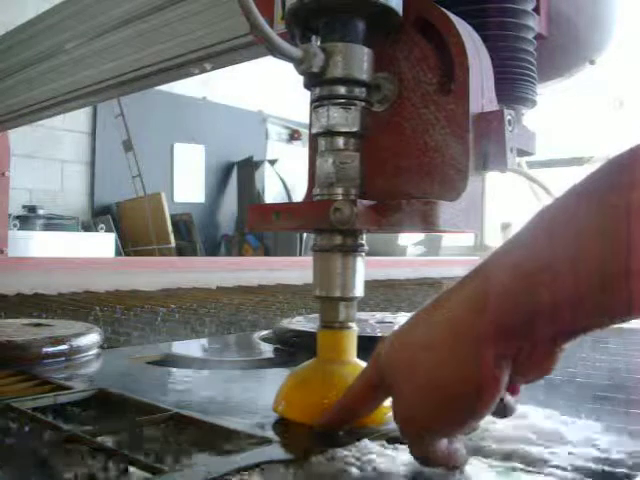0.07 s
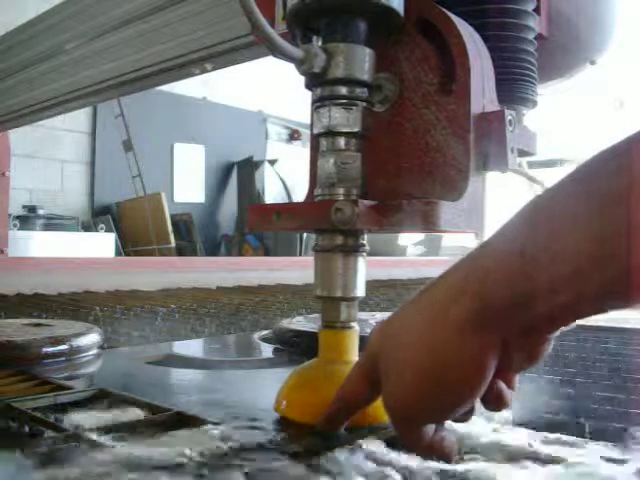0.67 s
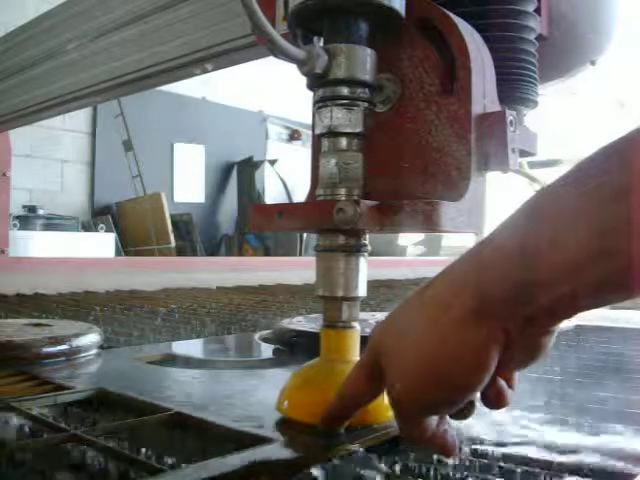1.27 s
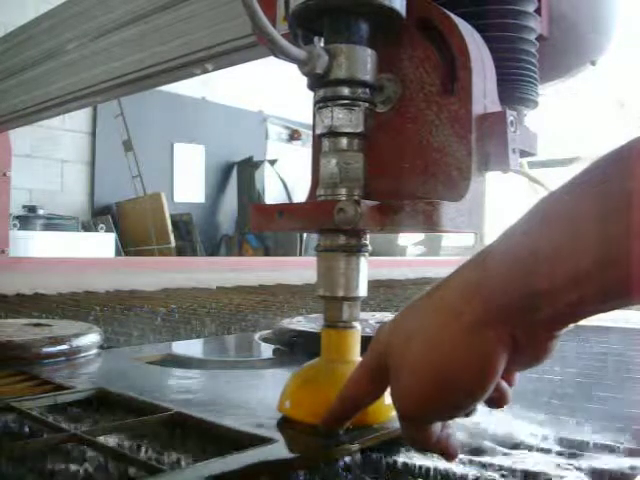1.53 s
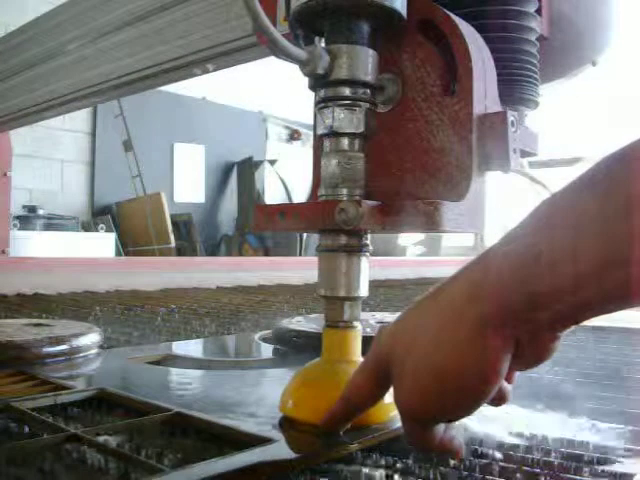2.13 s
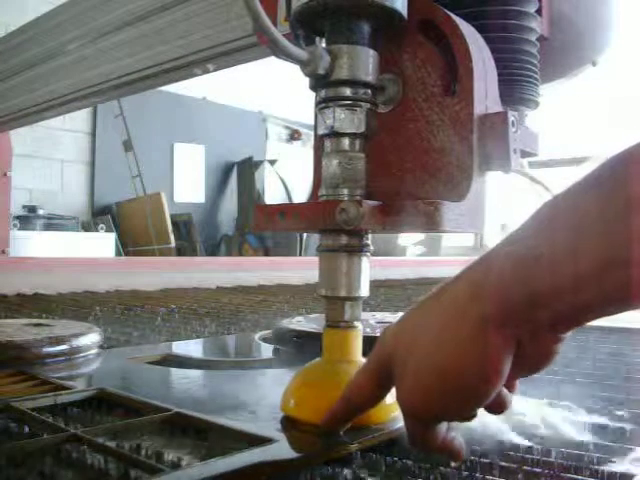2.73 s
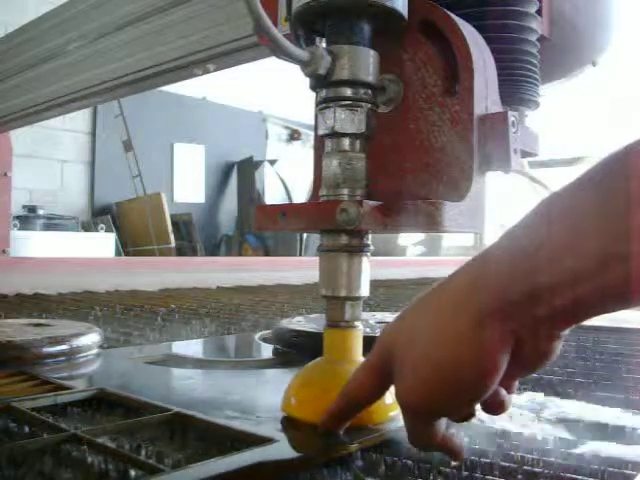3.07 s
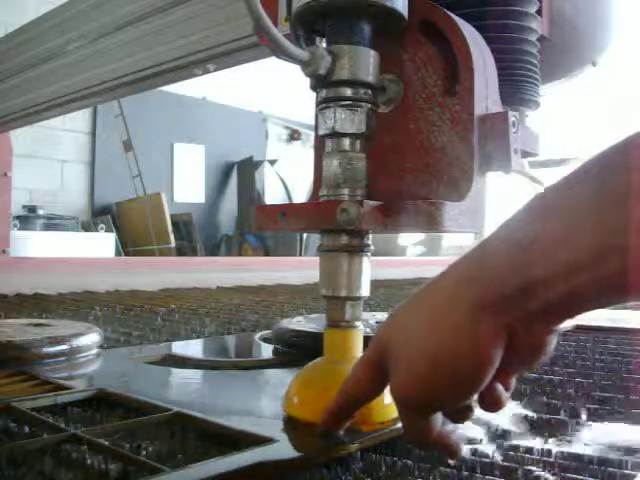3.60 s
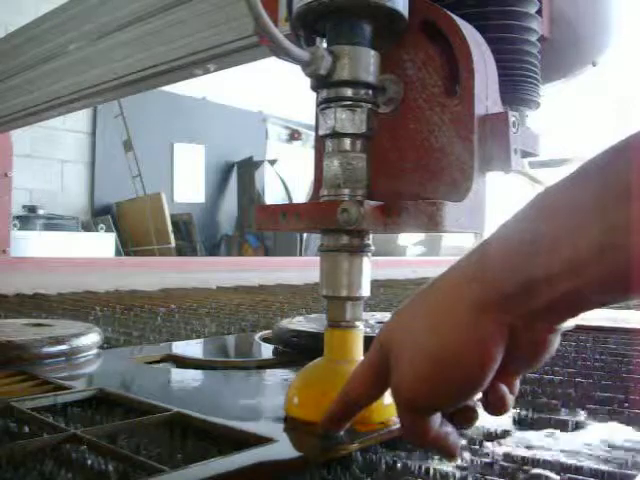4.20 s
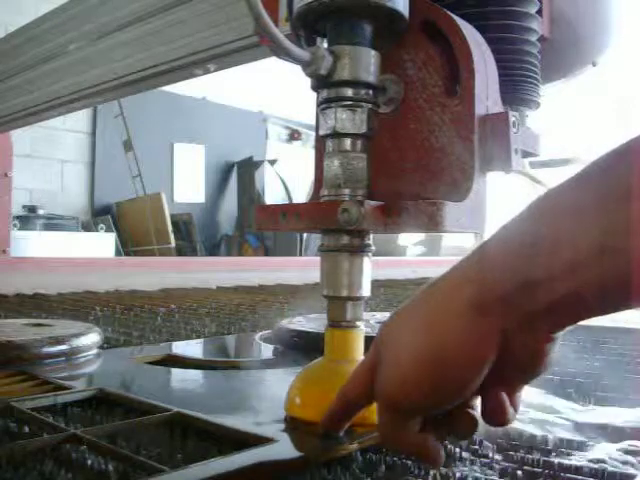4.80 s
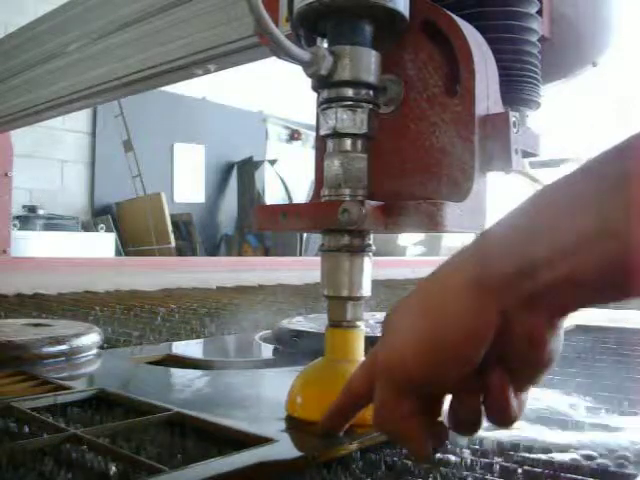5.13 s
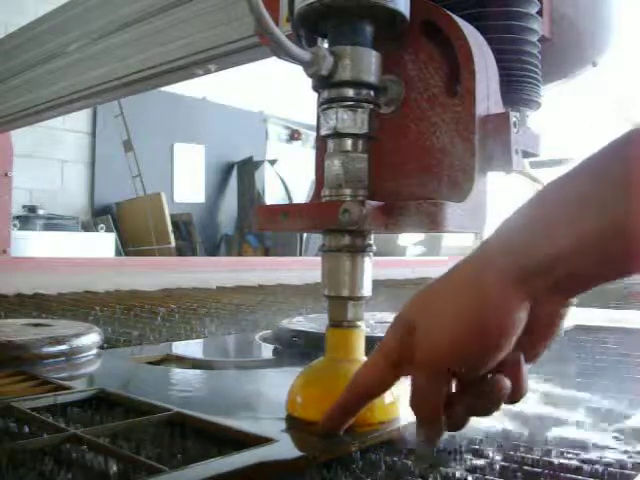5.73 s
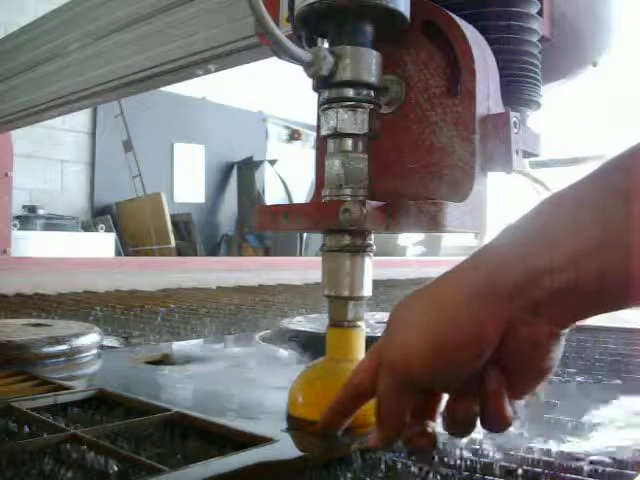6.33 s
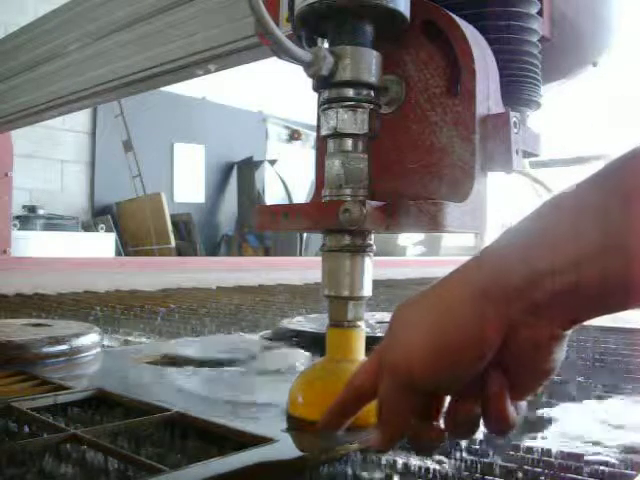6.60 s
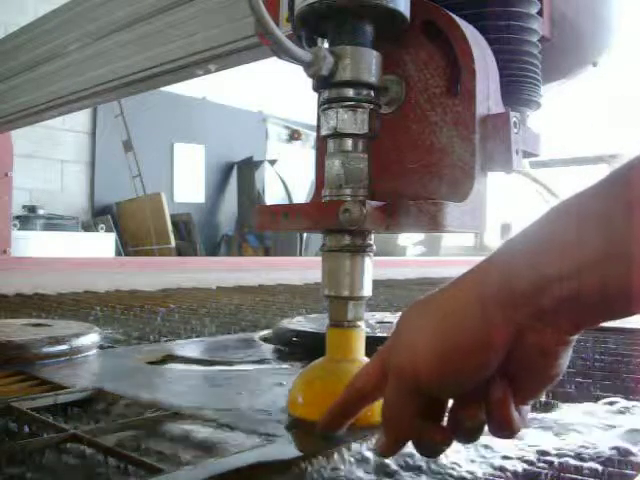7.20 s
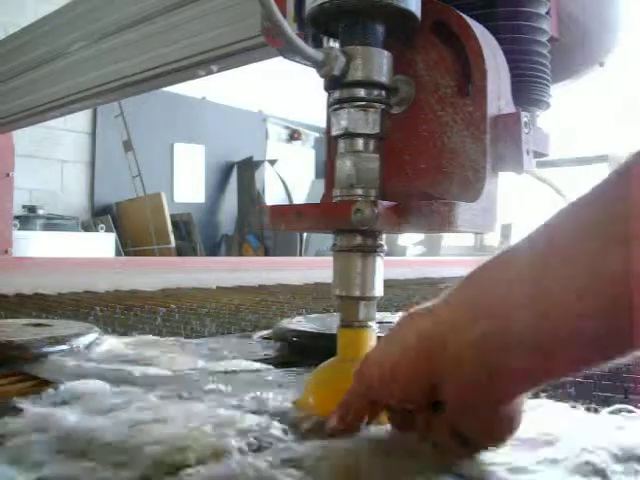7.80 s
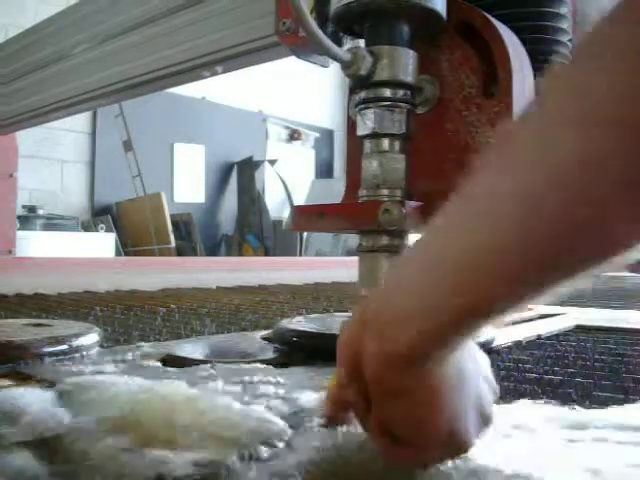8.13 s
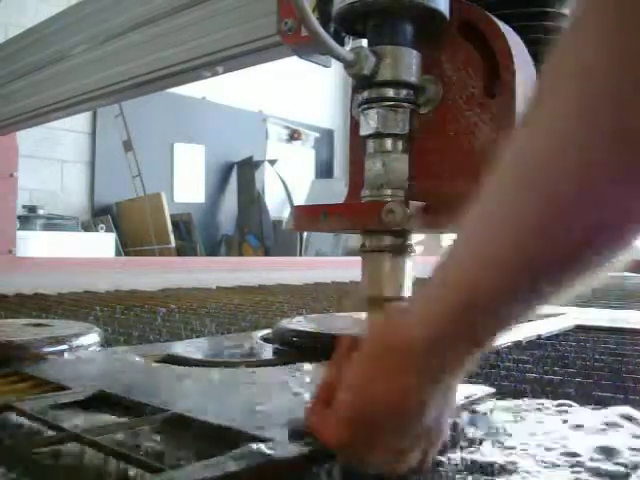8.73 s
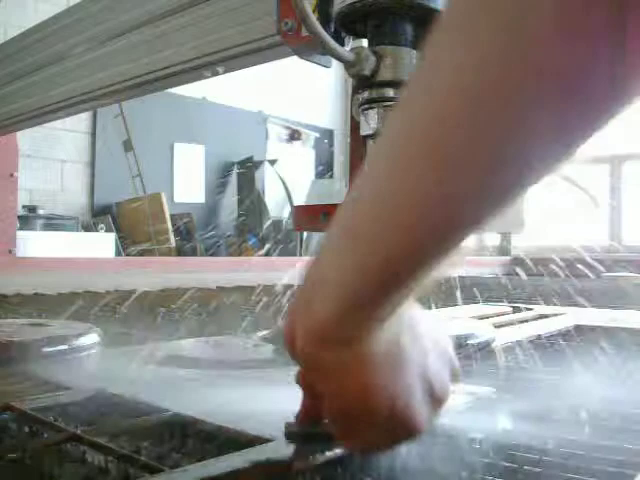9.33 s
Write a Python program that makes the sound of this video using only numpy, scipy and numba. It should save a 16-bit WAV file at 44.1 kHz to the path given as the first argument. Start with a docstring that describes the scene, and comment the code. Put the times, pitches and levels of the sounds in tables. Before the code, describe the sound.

Close to a small microphone in a workshop, a waterjet cutter roars and hisses through steel, choking and squirting as water floods the cut. The hiss steadies, then stops abruptly, leaving the booming rumble of a pump and light splashes of tank water on the plate. Near the end the jet bursts back in with a sharp spit and a wavering whistle over the hiss.

```python
"""An abrasive waterjet cuts a steel plate over a water tank, an arm's length from a small camera in a workshop.
The jet roars in the kerf, rings the plate and sputters whenever water floods the cut. Its valve shuts for
two seconds: the camera's gain control recovers and lifts the pump rumble and the splashing tank water,
until the jet strikes again and whistles through a fresh hole."""
import sys
import numpy as np
from scipy import signal
from scipy.fft import rfft, irfft
from scipy.io import wavfile
from scipy.ndimage import uniform_filter1d, minimum_filter1d
from numba import njit

SR = 44100
rng = np.random.default_rng(int(sys.argv[2]) if len(sys.argv) > 2 else 0)


def to_wav(sig):
    """Store sig (one row per channel, or 1-D mono) as 16-bit WAV at the path in sys.argv[1].

    Samples outside -1..1 are clipped; the rate is SR.
    """
    pcm = np.clip(np.atleast_2d(sig), -1, 1) * 32767
    pcm = np.round(pcm).astype(np.int16)
    wavfile.write(sys.argv[1], SR, pcm.T)  # frames by channels


N = 421155
TIME = np.arange(N) / SR
FREQS = np.fft.rfftfreq(N, 1 / SR)
VALVE_SHUTS_S, VALVE_OPENS_S = 7.09, 9.135

# faders of the background bed: t/s, pump rumble/dB, wash over the slats/dB
BED_FADERS = [(0, -17, -28), (6.9, -17.5, -22), (7.3, -16.5, -27.5), (7.5, -15.5, -24),
              (7.85, -16.5, -27.5), (8.45, -16.5, -24.5), (8.7, -16.3, -22), (9.1, -19, -23.5),
              (9.55, -18.5, -26)]
# tone of the pump rumble, the wash, the tank churn and the spray: f/Hz, relative level/dB
RUMBLE_EQ = [(20, -30), (45, -9), (75, -6), (160, -3.5), (280, -6.5), (420, -3.5), (650, -7), (950, -12.5),
             (1600, -20.5), (3000, -31.5)]
WASH_EQ = [(400, -8), (1300, -4.5), (1800, -0.5), (2600, 1), (3700, -4.5), (5200, -5.5), (6500, -9)]
CHURN_EQ = [(100, -17.5), (250, -10), (450, 3), (800, 5.5), (1500, -7), (3000, -20), (6000, -37.5)]
SPRAY_EQ = [(800, -30), (1700, -10), (2500, -6), (3400, -2.5), (3750, -2), (4300, 3), (5200, 1.5),
            (6500, 1.5), (9000, -44)]
# boom of the pump and tank walls: f/Hz, width/Hz, relative level/dB
BOOM_MODES = [(72.6, 10, -11), (110.6, 7.6, -1), (206.5, 13, -3), (226.9, 4, 1.5), (247.2, 3.8, -0.5),
              (263.1, 4.1, -5), (320.3, 23, 1), (419, 40, -3.5), (497, 2.6, -11.5), (607, 22, -11),
              (893, 72, -4.5), (1324, 80, -9)]
# motor hum: f/Hz, level/dB
MOTOR_TONES = [(122.5, -29.5), (233, -33.5)]
# splashes slap the plate: t/s, level/dB, f/Hz
PLATE_SPLASHES = [(7.497, -17, 3180), (7.515, -8, 1080), (7.584, -19, 2680), (7.666, -27, 3200),
                  (7.728, -19, 1600), (8.065, -12, 1100), (9.024, -14, 2120), (9.104, -21, 1800)]
# the spent jet stirs the tank: t/s, level/dB
CHURN_FADER = [(0, -11.5), (.7, -14.5), (.95, -13), (2, -9.5), (3.2, -10), (3.65, -8), (4.55, -10.5),
               (5.3, -13.5), (7.05, -10.5), (9.5, -15.5)]
# ring of the steel plate: f/Hz, width/Hz, relative level/dB
PLATE_MODES = [(958, 150, -0.5), (1327, 260, 1)]
# whistle of the fresh hole: f/Hz, width/Hz, relative level/dB
HOLE_MODES = [(886, 120, 1), (2920, 170, 7), (4980, 54, -5)]
# air pockets burst out of the flooded cut: t/s, level/dB, f/Hz
AIR_SPITS = [(.154, -8, 2840), (.321, 1.5, 2100), (.522, 6, 1860), (.567, -2.5, 2270), (.728, -1, 2960),
             (1.184, 13, 1430), (1.52, 13.5, 2000), (2.259, 13, 1140), (2.498, 11, 1140), (3.657, 4, 2390),
             (4.556, 22, 1300), (9.136, 14, 1950)]
# air pockets swell or shrink: t/s, length/s, level/dB, start f/Hz, end f/Hz, width/pitch
POCKET_GLIDES = [(0.164, .08, -6.5, 1100, 600, 1.3), (0.621, .12, -6, 600, 900, 1.4),
                 (1.016, 0.042, 2, 1900, 1300, .5), (1.183, 0.052, 4.5, 1500, 1950, .45),
                 (1.283, 0.037, 1.5, 2870, 3100, 0.28), (1.534, 0.074, 1.5, 2800, 3070, 0.24),
                 (1.691, 0.061, 5, 2720, 1800, .4), (2.253, 0.072, 1, 1040, 1390, .35),
                 (2.389, 0.038, 7, 1450, 1200, 0.44), (2.821, 0.053, 0, 2800, 2100, .35),
                 (3.419, 0.088, -1.5, 2700, 1300, 0.61), (3.513, .036, 2.5, 2900, 2000, .35),
                 (3.627, 0.18, -5, 1140, 940, 0.55), (4.36, 0.077, 0.5, 3320, 3100, 0.17),
                 (4.419, 0.096, 0.5, 3000, 2300, .3), (4.49, .09, 3.5, 2300, 1150, 0.46),
                 (4.571, 0.087, -2.5, 1210, 2200, 0.5), (6.554, 0.047, 0, 3170, 2600, .3),
                 (6.618, 0.036, -0.5, 4330, 2500, .35), (6.667, 0.038, 4, 3700, 2000, .35),
                 (9.211, 0.076, -1.5, 2400, 2800, 0.45)]
# water floods the cut and muffles the jet: start t/s, end t/s, depth/dB
FLOODS = [(0, .04, 6), (.1, .318, 7), (.432, .848, 12), (.878, .918, 8.5), (.998, 1.014, 12.5),
          (1.083, 1.111, 13.5), (1.158, 1.19, 12.5), (1.244, 1.27, 10), (1.32, 1.362, 12), (1.46, 1.475, 8),
          (1.498, 1.52, 12.5), (1.645, 1.682, 9.5), (1.748, 1.768, 6.5), (2.213, 2.312, 10),
          (2.378, 2.44, 5.5), (2.87, 2.915, 4), (3.425, 3.51, 7.5), (3.55, 3.77, 12), (3.79, 3.865, 6.5),
          (4.225, 4.27, 4.5)]
# the jet breaks free for a moment: t/s, length/s, lift/dB
BREAKOUTS = [(0.327, 0.031, 2.5), (.447, 0.049, 7), (0.518, .02, 10.5), (0.678, 0.075, 4),
             (0.773, .018, 7.5), (2.171, .05, 8.5), (2.228, .02, 10), (2.814, .035, 2), (3.566, .018, 12),
             (4.067, 0.057, 4.5), (9.138, .05, 5.5)]
# narrow peaks and notches from guard, plate and slats: f/Hz, width/Hz, gain/dB
MACHINE_EQ = [(1687, 73, -1), (1698, 25, 5.5), (1900, 40, 3), (2104, 71, 3), (2440, 18, -0.5),
              (2720, 150, 4.5), (3055, 99, 5.5), (3410, 110, 5.5), (3710, 130, -4), (3807, 68, 5),
              (5200, 200, 2)]
# slow arc of the cut, then the new hole: t/s, roar/dB, kerf f/Hz, spray/dB, plate ring/dB
CUT_ARC = [(0, -5, 2066, -6, -5.5), (.85, -4.5, 2290, -7, -12), (1.15, 3.5, 2185, -7, -6),
           (1.65, 4.5, 2480, -9, -2.5), (2.1, -6, 2550, -9, -9.5), (2.5, 3, 2294, -4.5, -1),
           (3.08, -4, 2240, -2, -9), (3.38, 3.5, 2165, 1, -4), (3.8, -4, 2414, -8, -6),
           (4.1, 0.5, 2740, -8.5, -12), (4.48, -0.5, 2670, -4.5, -2), (4.7, -2, 2855, 2, -9),
           (5.1, 1, 2555, -8, -11.5), (5.55, -3.5, 2490, 0, -10.5), (5.95, -2.5, 2630, -1, -11.5),
           (6.45, 1, 2670, -7.5, -5.5), (6.85, -2.5, 2394, -7, -4.5), (7.08, -7, 2490, -11, -9),
           (9.14, -6, 2084, -10, -2.5), (9.4, -7.5, 2080, -8, 0.5), (9.55, -15, 2590, -7.5, -14.5)]


def undb(db):
    """Decibels to gain."""
    return 10 ** (np.asarray(db) / 20)


def unit(x):
    """Scale to rms 1."""
    return x / np.sqrt(np.mean(x ** 2))


def curves(table):
    """One automation curve per column, in straight lines over time."""
    times, *columns = np.transpose(table)
    return [np.interp(TIME, times, column) for column in columns]


def gates(spans, edge_s):
    """Hold each (start, end, height) span, with short ramps at its edges."""
    held = sum(height * ((TIME > start) & (TIME < end)) for start, end, height in spans)
    return uniform_filter1d(1. * held, int(edge_s * SR))


def walk(rate):
    """Random modulation with about rate turns a second, at rms 1."""
    return unit(np.interp(TIME * rate, np.arange(N), rng.standard_normal(N)))


def colour(x, eq):
    """Shape x with a smooth EQ curve, at rms 1."""
    hz, db = np.transpose(eq)
    gain = undb(np.interp(np.log(FREQS + 1), np.log(hz), db))
    return unit(irfft(rfft(x) * gain, N))


@njit
def svf(x, tuning, damping):
    """State-variable band-pass, gain 1 at the centre."""
    out, band, low = np.empty(len(x)), 0., 0.
    for i in range(len(x)):
        g = tuning[i]
        v = (band + g * (x[i] - low)) / (1 + g * (g + damping))
        band, low = 2 * v - band, low + 2 * g * v
        out[i] = damping * v
    return out


def resonate(x, hz, relative_width):
    """A resonance whose centre may move."""
    tuning = np.tan(np.pi * np.minimum(hz, SR / 3) / SR) * np.ones(len(x))
    return svf(x, tuning, float(relative_width))


def ring(x, modes, drift=1):
    """Drive modes of alternating polarity, at rms 1; drift bends them all together."""
    return unit(sum((-1) ** k * undb(db) * unit(resonate(x, hz * drift, width / hz))
                    for k, (hz, width, db) in enumerate(modes)))


def impacts(rate, spread_db):
    """Random drop impacts of uneven size, at rms 1."""
    hits = (rng.random(N) < rate / SR) * rng.standard_normal(N)
    return unit(hits * undb(spread_db * np.minimum(rng.exponential(size=N), 4)))


def bursts(table, decay_s, relative_width):
    """Short puffs of turbulence, each ringing at its own pitch."""
    out = np.zeros(N)
    age = TIME[:SR // 10]
    for start, db, hz in table:
        b, a = signal.iirpeak(hz, 1 / relative_width, fs=SR)
        puff = unit(signal.lfilter(b, a, signal.lfilter(b, a, rng.standard_normal(len(age)))))
        first = int(start * SR)
        out[first:first + len(age)] += undb(db) * puff * np.exp(-age / decay_s)
    return out


def workshop(x, t60_s, wet_db):
    """Hard walls add a short diffuse tail."""
    age = TIME[:SR]
    tail = rng.standard_normal(SR) * undb(-60 * age / t60_s) * (age > .008)
    return x + undb(wet_db) * signal.fftconvolve(x, tail / np.linalg.norm(tail))[:N]


def pump(rumble_db):
    """The pump runs throughout: a wavering motor hum and a rumble that booms in the tank walls."""
    rumble = colour(impacts(rate=2500, spread_db=.55), RUMBLE_EQ) * undb(rumble_db + .91 * walk(rate=22))
    boom = ring(rng.standard_normal(N), BOOM_MODES) * undb(rumble_db + 1.37)
    hum = sum(undb(db + 1.7 * walk(rate=12)) * unit(np.sin(2 * np.pi * hz * TIME + 1.7 * walk(rate=5.9)))
              for hz, db in MOTOR_TONES)
    return rumble + boom + hum


def water(wash_db):
    """Water fizzes over the slats; single splashes slap the plate."""
    wash = colour(impacts(rate=5000, spread_db=1.2), WASH_EQ) * undb(wash_db + .97 * walk(rate=35))
    return wash + bursts(PLATE_SPLASHES, decay_s=.0047, relative_width=.45)


def tank_churn():
    """The spent jet stirs the tank into a dense, dark patter."""
    patter = colour(impacts(rate=2500, spread_db=.8), CHURN_EQ)
    return patter * undb(curves(CHURN_FADER)[0] + .69 * walk(rate=25))


def plate_ring(level_db):
    """A hail of tiny impacts rings the steel plate."""
    steel = ring(impacts(rate=3000, spread_db=2), PLATE_MODES)
    return unit(resonate(steel, hz=1200, relative_width=3.3)) * undb(level_db + 2 * walk(rate=35))


def hole_whistle(decay_s=.8):
    """The fresh hole's whistle wanders and fades as the jet bores through."""
    age = np.maximum(TIME - VALVE_OPENS_S, 0)
    wander = np.exp(.025 * walk(rate=25))
    whistle = ring(rng.standard_normal(N), HOLE_MODES, wander)
    return whistle * undb(-1.5) * (age > 0) * np.exp(-age / decay_s)


def squirts():
    """Turbulence rings air pockets whose pitch trembles and glides as their size changes."""
    out = np.zeros(N)
    tremble = np.exp(.08 * walk(rate=200))
    for start, length, db, from_hz, to_hz, width in POCKET_GLIDES:
        n, first = int(length * SR), int(start * SR)
        hz = np.geomspace(from_hz, to_hz, n) * tremble[first:first + n]
        pocket = unit(resonate(resonate(rng.standard_normal(SR)[:n], hz, width), hz, width))
        out[first:first + n] += undb(db) * pocket * signal.windows.tukey(n, .3)
    return out


def gurgle(kerf_hz, rate=110, pitch_spread=.2, spread_db=3):
    """Air pockets collapse one after another, each ringing briefly near the kerf's resonance."""
    count = int(rate * N / SR)
    starts = rng.random(count) * (N / SR - .11)
    size, detune = rng.standard_normal((count, 2)).T
    hz = kerf_hz[(starts * SR).astype(int)] * np.exp(pitch_spread * detune)
    pops = zip(starts, spread_db * np.minimum(size, 1), np.minimum(hz, SR / 3))
    return unit(bursts(pops, decay_s=.008, relative_width=.14))


def stream_hiss(level_db):
    """Most of the supersonic stream's power lies in a very high hiss."""
    highpass = signal.butter(12, 9000, "high", fs=SR, output="sos")
    return unit(signal.sosfilt(highpass, rng.standard_normal(N))) * undb(level_db)


def jet_spray(level_db, unrest):
    """Bright spray that flickers more when the cut is restless."""
    flicker_db = 2.6 * unrest * walk(rate=50)
    return colour(rng.standard_normal(N), SPRAY_EQ) * undb(level_db + flicker_db)


def hollow_slot(x, flooded, hz=1530, width_hz=340, notch_db=-15.5):
    """The open slot cancels one band and sounds hollow; water in the cut fills the notch in."""
    clear = 1 - np.tanh(5 * uniform_filter1d(flooded, size=SR // 3))
    return x + clear * (undb(notch_db) - 1) * resonate(x, hz, width_hz / hz)


def kerf_roar(kerf_hz, unrest, relative_width=.75):
    """The air pocket in the kerf keeps changing size, so its roar trembles and gurgles."""
    pocket_hz = kerf_hz * np.exp(.09 * unrest * walk(rate=110))
    roar = resonate(rng.standard_normal(N), pocket_hz, relative_width)
    roar = unit(resonate(roar, pocket_hz, relative_width))
    return unit(roar + .75 * unrest * gurgle(kerf_hz))


def jet(sag_octaves_per_db=.0095):
    """All layers of the jet, gated by its valve; floods duck roar, spray and hiss and lower the pitch."""
    roar_db, kerf_hz, spray_db, plate_db = curves(CUT_ARC)
    flood_db = gates(FLOODS, edge_s=.0068)
    lift_db = gates([(start, start + length, db) for start, length, db in BREAKOUTS], edge_s=.007)
    muffle_db = flood_db - lift_db
    flooded = 1. * (flood_db > 1)
    # near a flood the cut is restless; a clear cut runs more evenly
    unrest = .3 + .7 * np.tanh(10 * uniform_filter1d(flooded, size=SR))
    sputter = undb(unrest * (.9 * walk(rate=90) + walk(rate=260)))
    sagging_hz = kerf_hz * 2 ** (-sag_octaves_per_db * muffle_db)
    roar = kerf_roar(sagging_hz, unrest) * undb(roar_db - muffle_db)
    spray = jet_spray(spray_db - .86 * muffle_db, unrest)
    blast = hollow_slot(roar + spray, flooded) * sputter + plate_ring(plate_db) + squirts()
    blast += bursts(AIR_SPITS, decay_s=.0064, relative_width=.74)
    for hz, width, db in MACHINE_EQ:
        blast += (undb(db) - 1) * resonate(blast, hz, width / hz)
    valve = uniform_filter1d(1. * ((TIME < VALVE_SHUTS_S) | (TIME > VALVE_OPENS_S)), size=100)
    return valve * (blast + hole_whistle() + tank_churn() + stream_hiss(10 - .19 * muffle_db))


def scene():
    """The jet, with a touch of room, over a bed of pump and tank water, in mono."""
    rumble_db, wash_db = curves(BED_FADERS)
    cutting = workshop(jet(), t60_s=.45, wet_db=-23)
    return (cutting + pump(rumble_db) + water(wash_db))[None]


@njit
def peak_hold(x, release_s):
    """Follow each peak at once, then let go."""
    keep = np.exp(-1 / (release_s * SR))
    held, peak = np.empty(len(x)), 0.
    for i in range(len(x)):
        peak = max(abs(x[i]), peak * keep)
        held[i] = peak
    return held


def record(dry, target_db=-4, response_s=.088, band_hz=5490, ceiling=.7, top_hz=15900):
    """The camera rides its gain on all it hears, hiss included, then cuts the highs and limits peaks."""
    x = dry[0]
    keep = np.exp(-1 / (response_s * SR))
    power = signal.lfilter([1 - keep], [1, -keep], x ** 2, zi=[np.mean(x[:SR // 10] ** 2)])[0]
    x = x * np.minimum(1, undb(target_db) / np.sqrt(power))
    x = signal.fftconvolve(x, signal.firwin(121, band_hz, window=("kaiser", 9), fs=SR), "same")
    # a fast limiter rounds most peaks; the sharpest slip through and are squared off
    limiter_gain = np.minimum(1, ceiling / (peak_hold(x, release_s=.001) + 1e-9))
    ease = signal.windows.hann(71)
    x = x * np.convolve(minimum_filter1d(limiter_gain, size=29), ease / ease.sum(), "same")
    x = np.clip(x, -ceiling * 1.04, ceiling * 1.04)
    return signal.fftconvolve(x, signal.firwin(201, top_hz, fs=SR), "same")[None]


dry = scene()
out = record(dry)
to_wav(out)
```